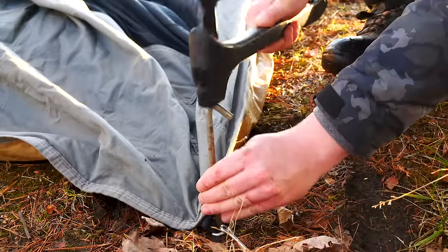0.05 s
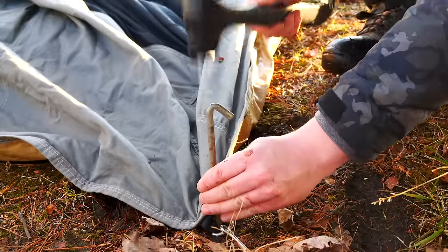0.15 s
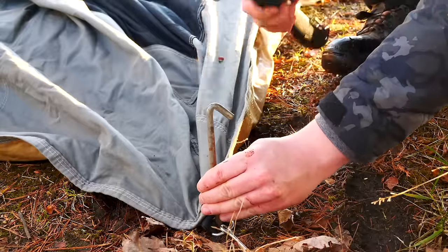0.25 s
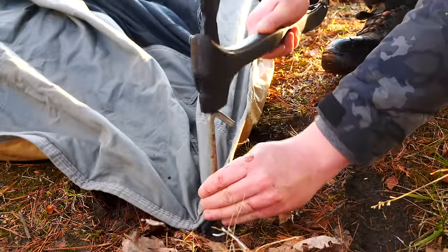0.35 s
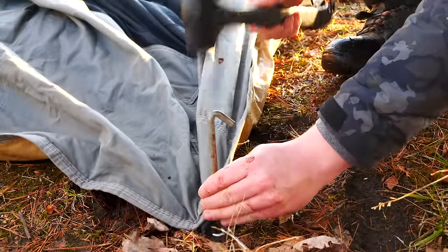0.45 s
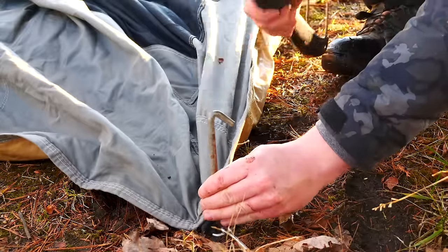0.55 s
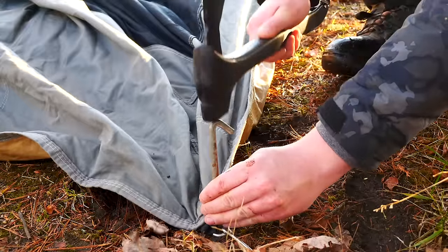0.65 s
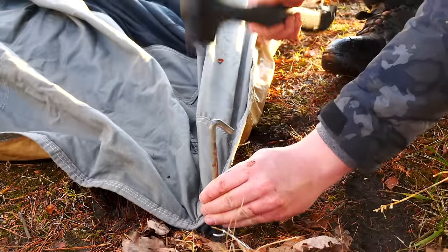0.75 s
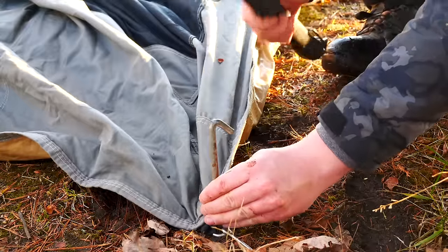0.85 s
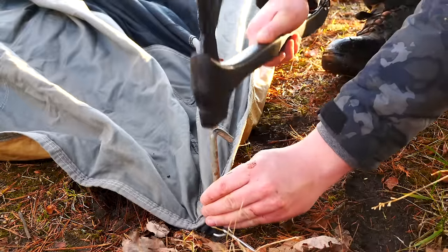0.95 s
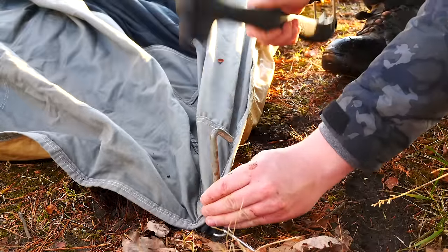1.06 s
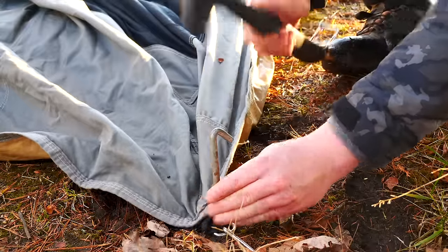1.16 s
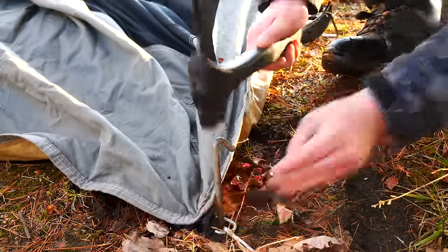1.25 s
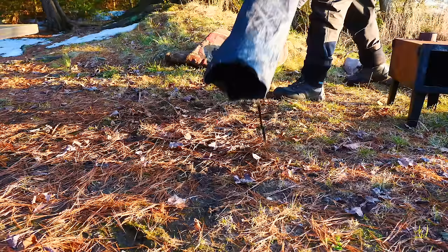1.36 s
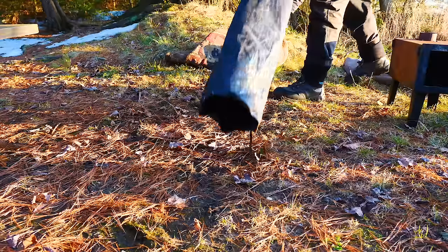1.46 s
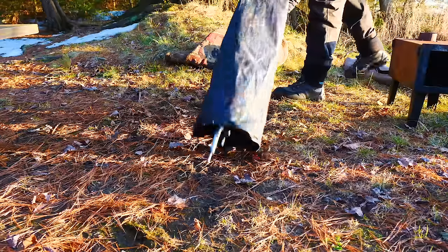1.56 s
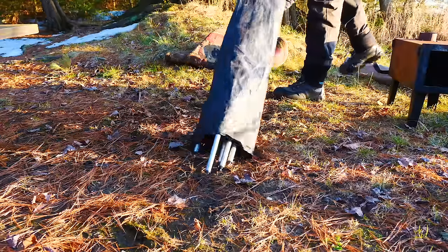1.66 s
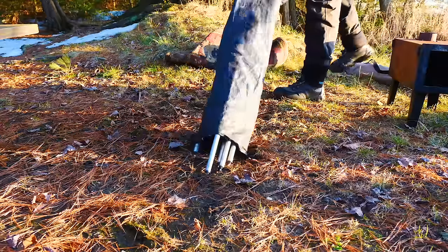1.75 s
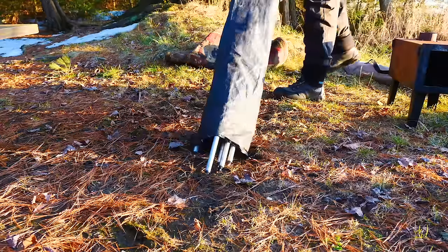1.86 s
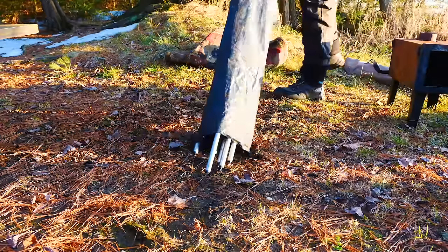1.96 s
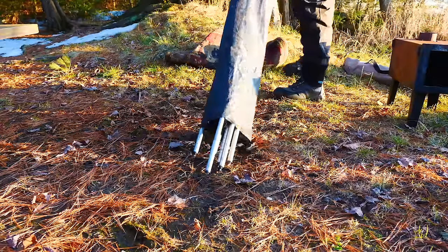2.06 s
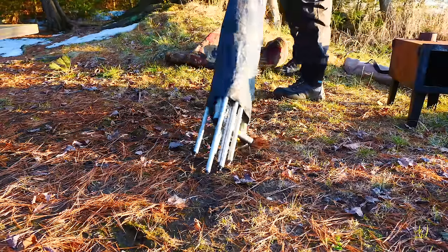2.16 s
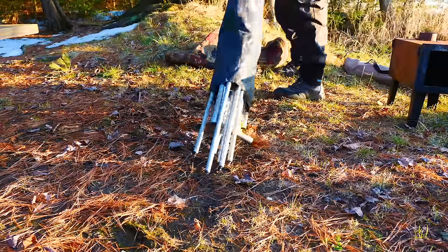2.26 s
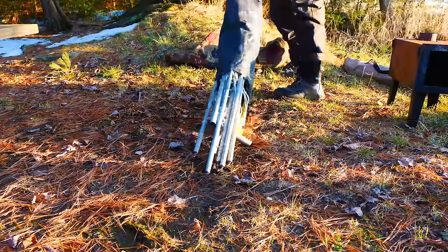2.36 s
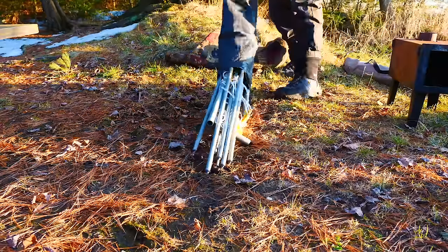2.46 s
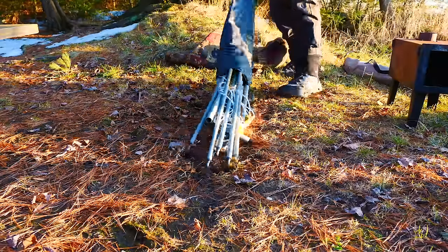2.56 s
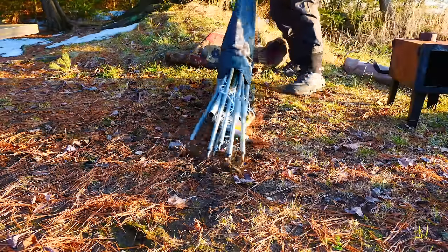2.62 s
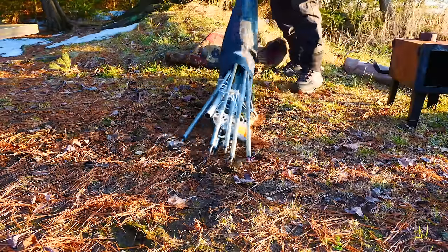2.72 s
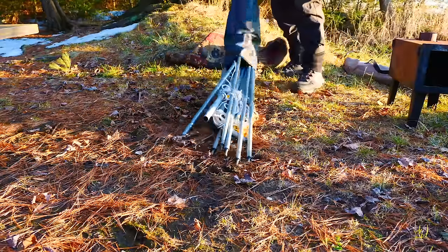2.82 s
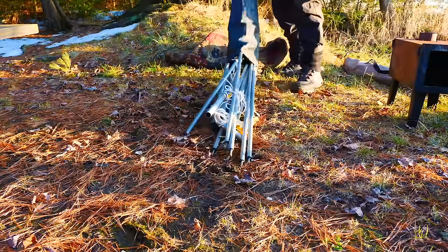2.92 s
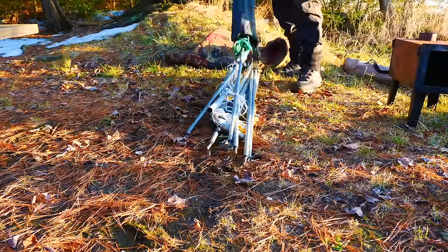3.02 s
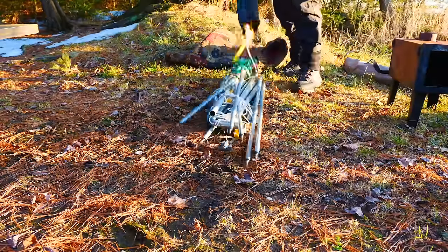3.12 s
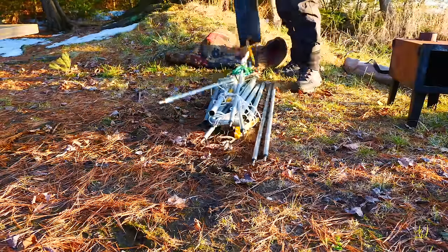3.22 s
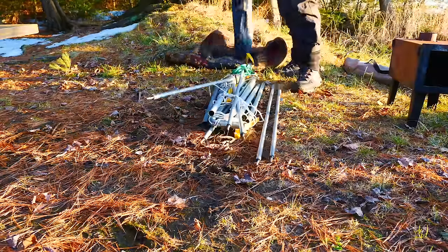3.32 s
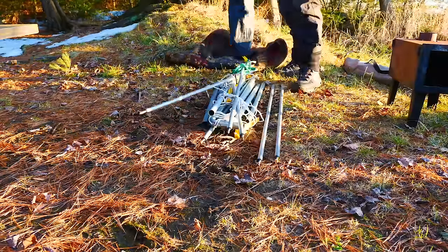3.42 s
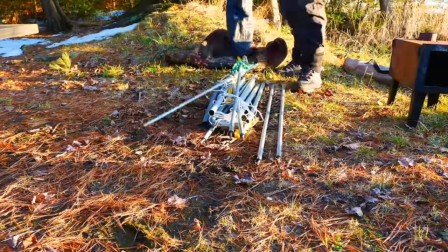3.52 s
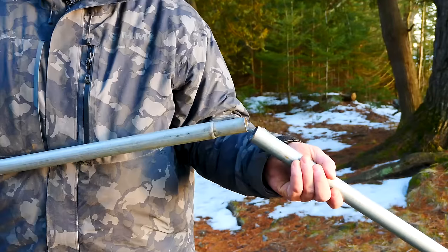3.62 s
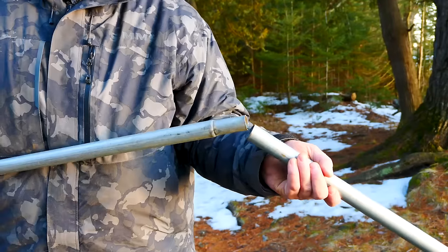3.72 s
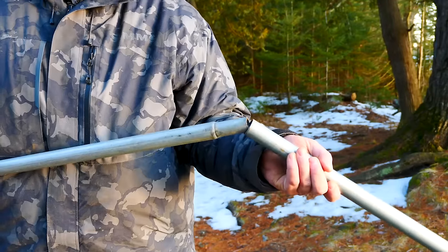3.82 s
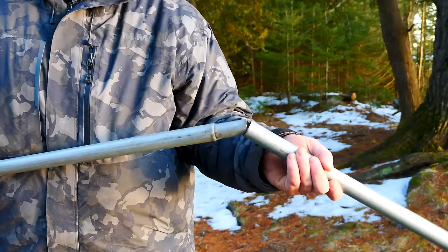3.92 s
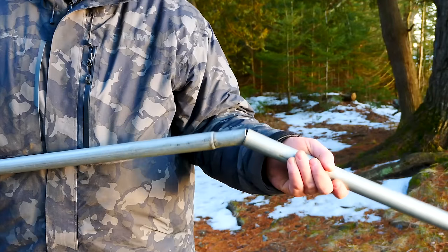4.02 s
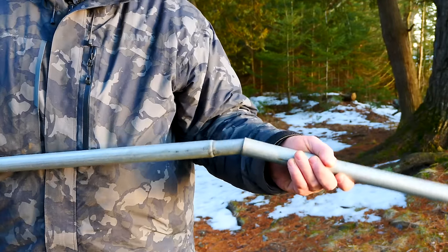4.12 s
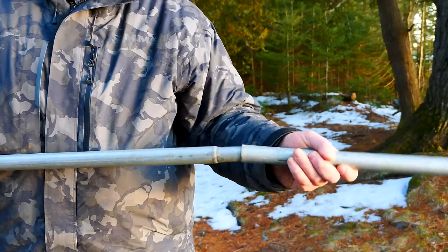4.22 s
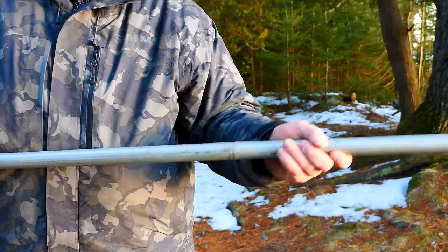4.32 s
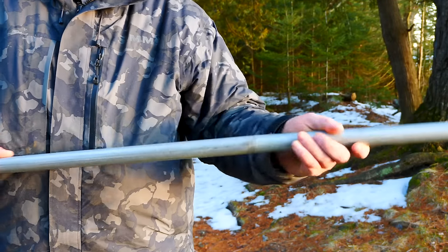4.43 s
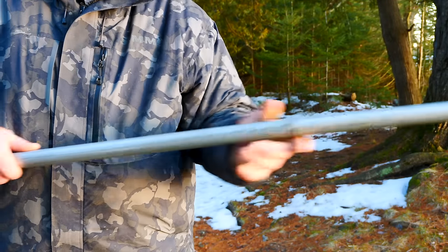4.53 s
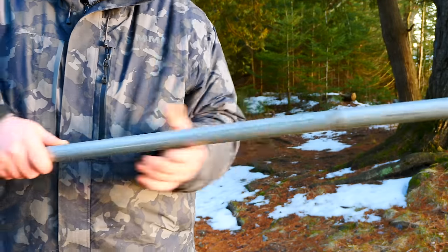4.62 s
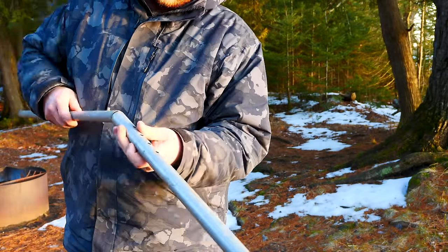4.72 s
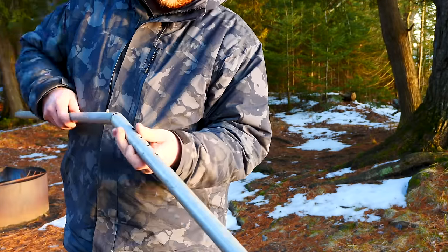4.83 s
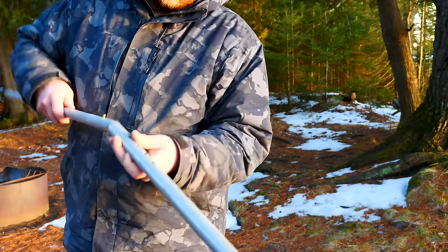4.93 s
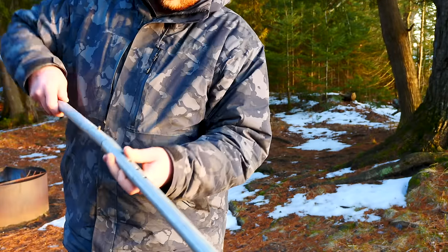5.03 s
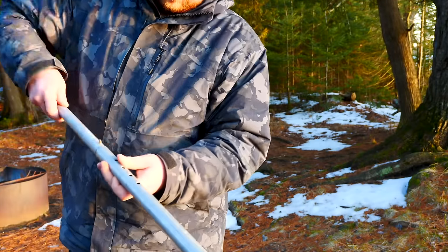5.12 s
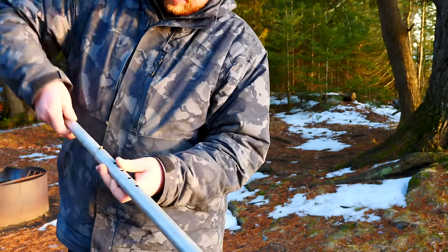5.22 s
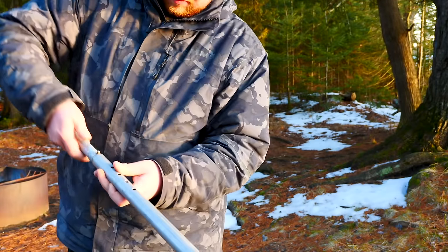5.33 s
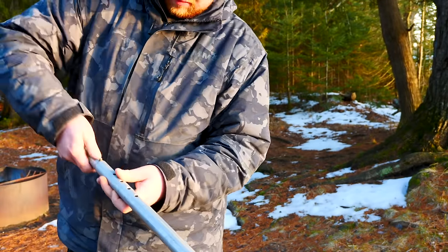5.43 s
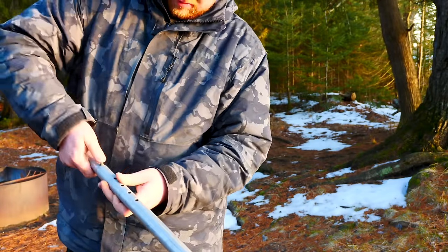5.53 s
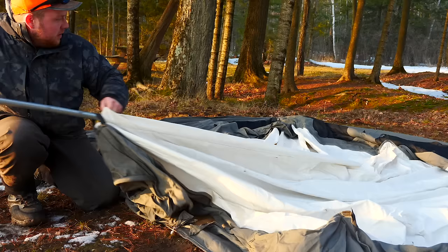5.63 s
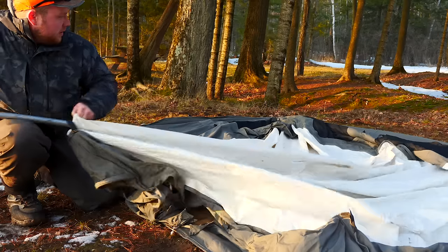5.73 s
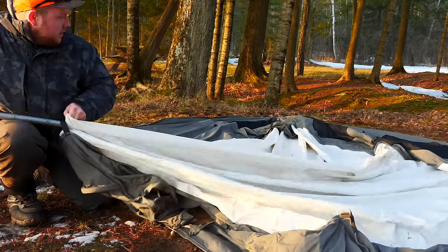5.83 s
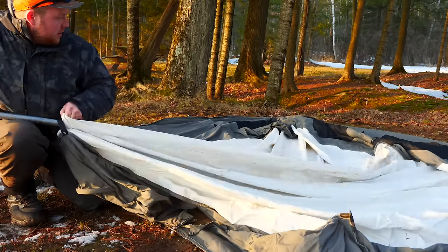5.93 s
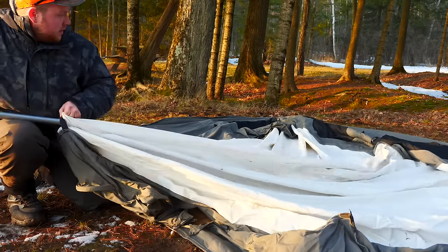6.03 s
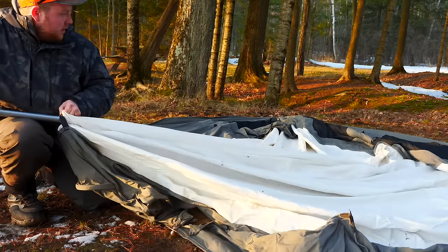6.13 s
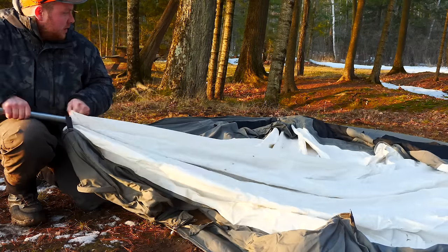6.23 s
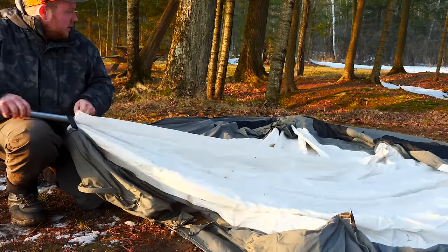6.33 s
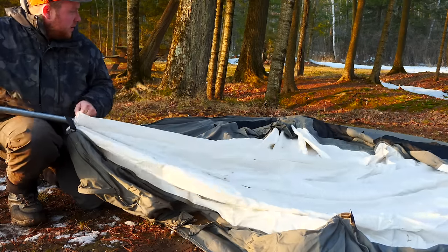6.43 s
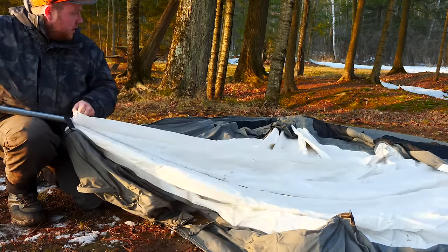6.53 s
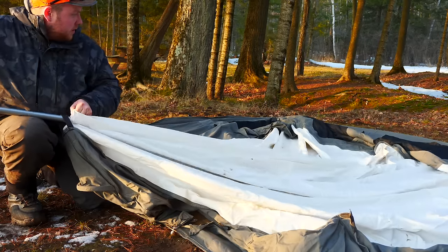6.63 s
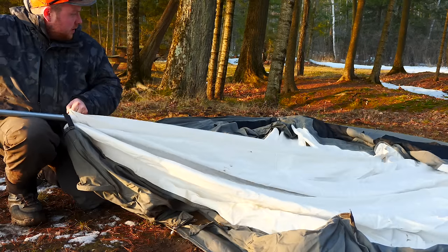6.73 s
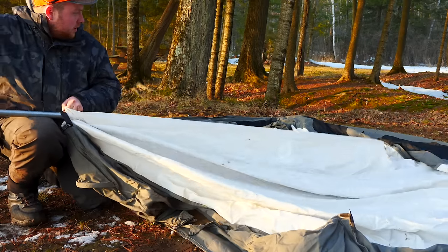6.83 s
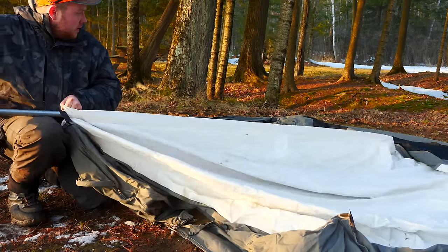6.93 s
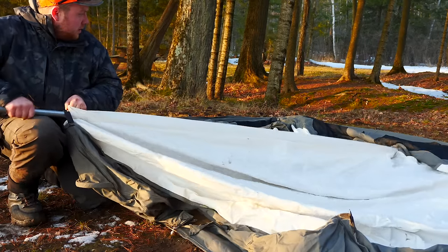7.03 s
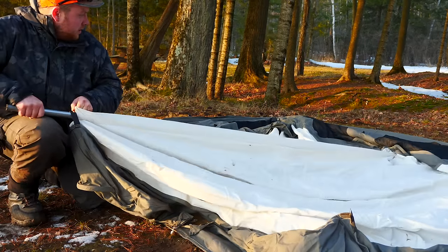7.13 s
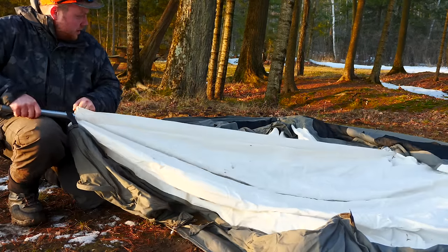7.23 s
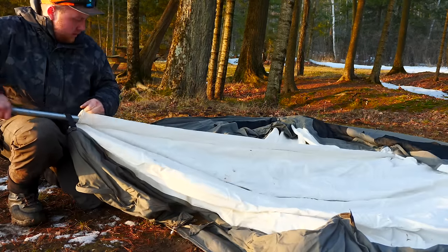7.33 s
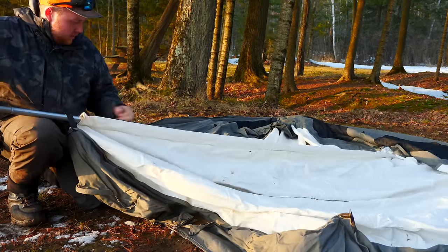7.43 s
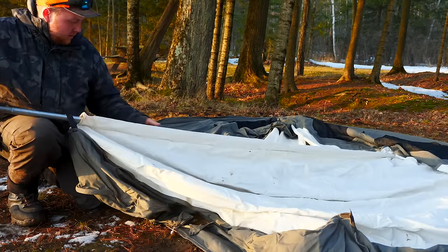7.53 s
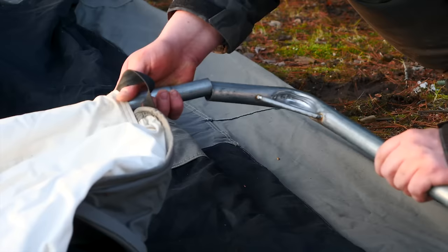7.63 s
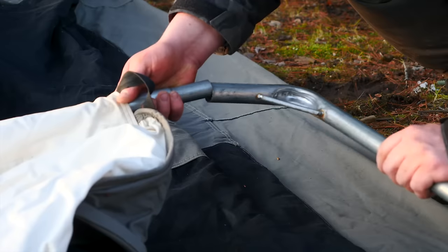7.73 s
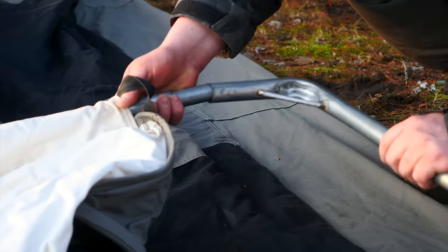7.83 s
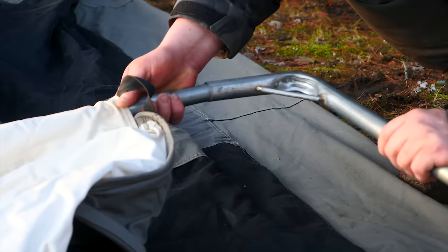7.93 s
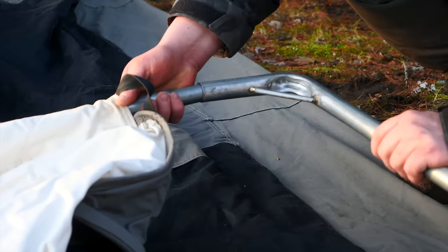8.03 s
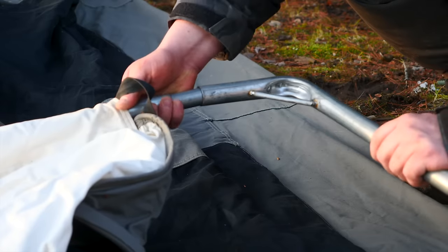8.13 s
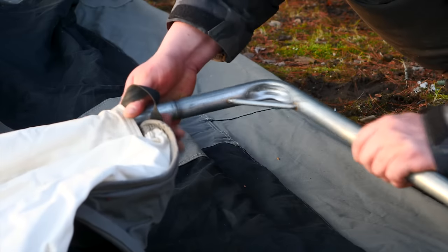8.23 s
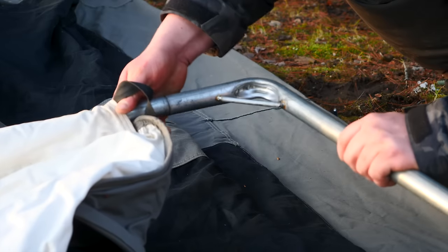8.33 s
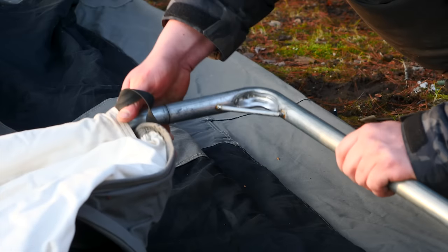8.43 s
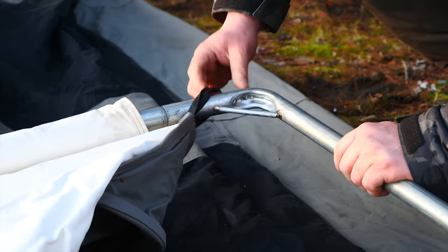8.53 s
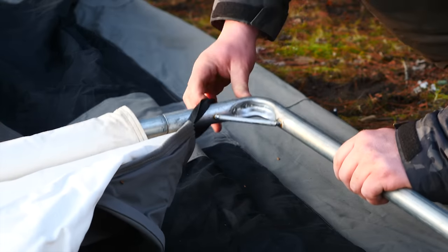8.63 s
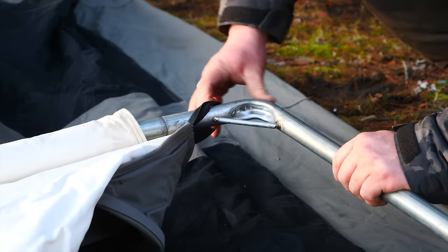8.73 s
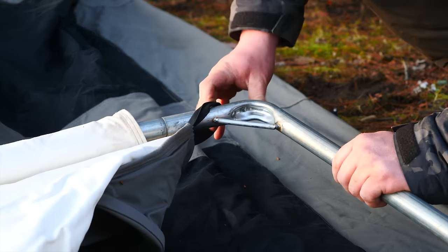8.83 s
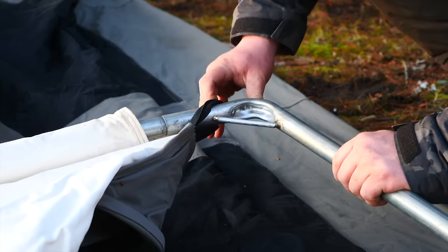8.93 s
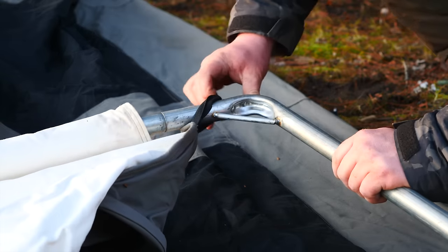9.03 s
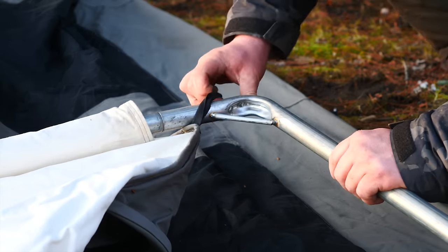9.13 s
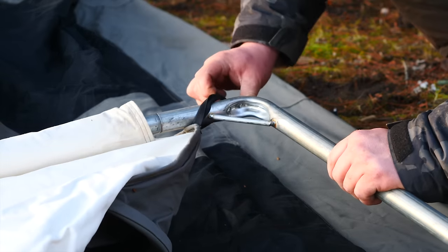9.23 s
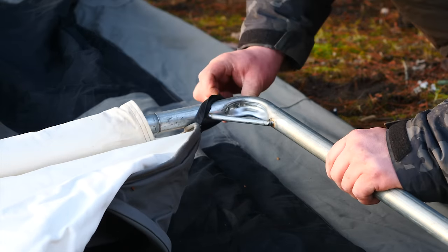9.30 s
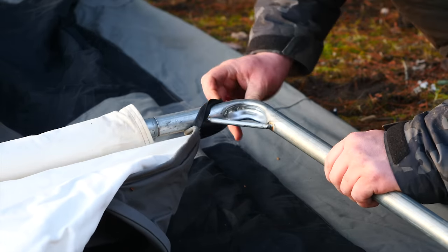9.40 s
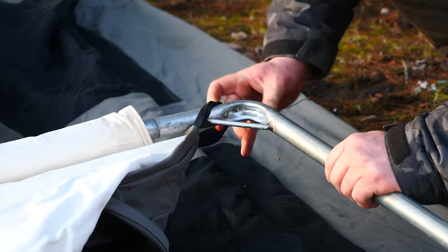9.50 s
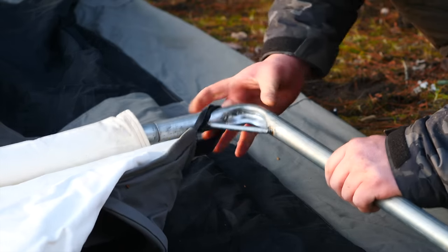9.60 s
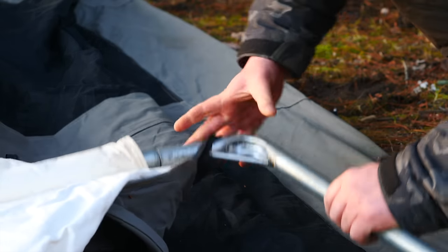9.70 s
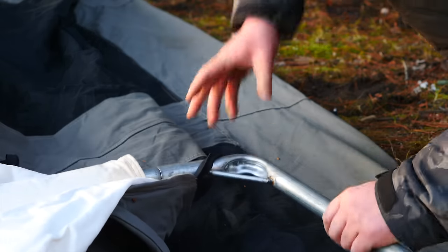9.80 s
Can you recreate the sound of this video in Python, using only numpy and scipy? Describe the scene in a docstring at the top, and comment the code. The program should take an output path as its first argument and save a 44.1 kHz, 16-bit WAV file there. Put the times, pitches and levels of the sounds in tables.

```python
"""Hammer blows, tumbling and clinking poles, a zip-like scrape and rustling cloth over a quiet wood's hush.
Short scenes of pitching a steel-frame tent, end to end: a peg hammered in, poles leaving their bag, two joints
pushed home, a pole slid through a woven sleeve, an elbow piece fitted. Steel is noise bursts and grit driving
decaying modes, cloth is shaped noise and crackle, the sleeve a thread-rate tone with hiss. Nearly mono; clips."""
import sys
import numpy as np
from scipy import signal
from scipy.fft import rfft, irfft, next_fast_len
from scipy.io import wavfile

SR = 44100
rng = np.random.default_rng(int(sys.argv[2]) if len(sys.argv) > 2 else 0)


def wrap_up_sound(samples):
    """Save the sound to the file named by the first command line argument, as 16-bit audio."""
    columns = np.atleast_2d(samples).T
    # keep every value between -1 and 1, then stretch to whole-number steps
    tamed = np.clip(columns, -1, 1)
    steps = np.round(tamed * 32767).astype(np.int16)
    wavfile.write(sys.argv[1], SR, steps)


N = 434826
TIME = np.arange(N) / SR
SPLIT_HZ = 1330   # between dull and bright halves

# cloth noise spectrum: (frequency [Hz], relative level [dB])
CLOTH_SPECTRUM = [(47, -26), (80, -15), (287, 3), (649, 7), (1500, 5), (11600, -11.5), (15500, -23)]
# steel contact noise spectrum: (frequency [Hz], relative level [dB])
STEEL_SPECTRUM = [(250, -38.5), (1240, -19), (2180, -14), (5540, -20.5), (7130, -23), (11600, -30.5),
                  (15500, -56)]
# hammer blows on the peg: (time [s], strike level [dB])
HAMMER_BLOWS = [(0.1126, -10), (0.4039, -10), (0.696, -9.5), (0.988, -11), (1.271, -9)]
# knocks on the poles: (time [s], strike level [dB], dull part re strike level [dB])
POLE_KNOCKS = [(1.414, -35.5, 8), (3.8666, -20.5, 10.5), (3.8756, -15, -9), (4.0295, -44, 15),
               (4.164, -46, 10), (4.193, -36, -3), (4.355, -13, -6), (4.442, -37.5, 9), (4.493, -35, -4),
               (4.63, -48.5, 22.5), (4.7764, -18.5, 7.5), (4.834, -28.5, -0.5), (4.924, -39, -6),
               (5.02, -35, -42), (5.221, -13.5, -0.5), (7.6233, -22.5, 11), (7.909, -49.5, 14),
               (7.9927, -35.5, 2), (8.02, -30, 7), (8.154, -32, -19), (9.634, -34, -47), (9.6628, -33, -37),
               (9.7657, -38, 5)]


def from_db(db):
    """Gain of a level in dB."""
    return 10 ** (np.asarray(db) / 20)


def rms_one(x):
    """Scale to rms 1."""
    return x / np.sqrt(np.mean(x ** 2) + 1e-20)


def gain_curve(rows):
    """Gain from (time [s], level [dB]) rows, linear in dB; -200 dB outside them."""
    rows = np.array(rows)
    return from_db(np.interp(TIME, rows[:, 0], rows[:, 1], left=-200, right=-200))


def drift(rate_hz):
    """Smoothed random signal, rms 1: noise through two equal one-pole low-passes."""
    r = np.exp(-2 * np.pi * rate_hz / SR)
    settle = 9000   # samples
    noise = rng.standard_normal(N + settle)
    return rms_one(signal.lfilter([1], [1, -2 * r, r * r], noise)[settle:])


def level_db(hz, spectrum):
    """Spectrum level at hz, interpolated over log frequency."""
    points = np.array(spectrum)
    return np.interp(np.log(hz), np.log(points[:, 0]), points[:, 1])


def bin_hz(size):
    """FFT bin frequencies, at least 1 Hz."""
    return np.maximum(np.arange(size // 2 + 1) * SR / size, 1)


def filtered(x, spectrum):
    """x through a smooth zero-phase response."""
    length = x.shape[-1]
    size = next_fast_len(length)
    gain = from_db(level_db(bin_hz(size), spectrum))
    return irfft(rfft(x, size) * gain, size)[..., :length]


def coloured(x, spectrum):
    """Dull and bright halves of x shaped by a spectrum, each rms 1."""
    size = next_fast_len(len(x))
    hz = bin_hz(size)
    shaped = rfft(x, size) * from_db(level_db(hz, spectrum))
    low = 1 / (1 + (hz / SPLIT_HZ) ** 4)
    dull = irfft(shaped * low, size)[:len(x)]
    bright = irfft(shaped * (1 - low), size)[:len(x)]
    return rms_one(dull), rms_one(bright)


def grains(per_s, spread_db):
    """Random clicks of uneven size and either sign, rms 1."""
    sizes = from_db(spread_db * np.minimum(rng.exponential(1, N), 4))
    signs = rng.choice([-1, 1], N)
    return rms_one(sizes * signs * (rng.random(N) < per_s / SR))


def ring(drive, hz, t60_s):
    """Two-pole resonator: a unit click starts a decaying sine of height 1."""
    r, w = from_db(-60 / (t60_s * SR)), 2 * np.pi * hz / SR
    return signal.lfilter([0, np.sin(w)], [1, -2 * r * np.cos(w), r * r], drive + 1e-18)


def clicks(times_s, db):
    """One impulse at each time."""
    out = np.zeros(N)
    out[np.round(np.asarray(times_s) * SR).astype(int)] = from_db(db)
    return out


def cracks(events, halves, t60_s, tail_t60_s, tail_db):
    """Each contact is a noise burst with a sub-millisecond rise and fast decay, over a softer longer tail."""
    rows, out = np.array(events), 0
    fast, slow = from_db(-60 / (t60_s * SR)), from_db(-60 / (tail_t60_s * SR))
    rise = np.exp(-1 / (0.00087 * SR))
    for half, db in zip(halves, (rows[:, 1] + rows[:, 2], rows[:, 1])):
        hits = signal.lfilter([1 - rise], [1, -rise], clicks(rows[:, 0], db) + 1e-18)
        burst = signal.lfilter([1], [1, -fast], hits)
        tail = signal.lfilter([1], [1, -slow], hits)
        out = out + half * (burst + from_db(tail_db) * tail)
    return out


def wood():
    """Steady hush of the wood: shaped noise."""
    # hush spectrum: (frequency [Hz], relative level [dB])
    hush_spectrum = [(35, -42), (60, -5), (869, 2), (1480, -21), (6120, -14), (15500, -58)]
    return from_db(-62.5) * rms_one(filtered(rng.standard_normal(N), hush_spectrum))


def wind():
    """Lumpy low-band noise on the microphone: a faint steady rumble and one gust."""
    # gust envelope: (time [s], level [dB])
    gust_rows = [(4.76, -39), (5.68, -48.5)]
    rumble_band = signal.butter(2, [28, 55], "band", fs=SR, output="sos")
    low_band = signal.butter(1, [30, 200], "band", fs=SR, output="sos")
    rumble = rms_one(signal.sosfilt(rumble_band, rng.standard_normal(N)))
    low = rms_one(signal.sosfilt(low_band, rng.standard_normal(N)))
    return gain_curve(gust_rows) * (rumble + from_db(-7.0) * low) + from_db(-60.5) * low


def soil():
    """Blows send a late slow wave through the ground; modes of opposite sign make it swell, then beat."""
    # soil modes under the microphone stand: (frequency [Hz], level re blow [dB], t60 [s])
    ground_modes = [(36, -28, 0.5), (46.3, -26, 0.38)]
    lag_s = 0.0306
    s, db = np.transpose(HAMMER_BLOWS)
    return sum((-1) ** k * ring(clicks(s + lag_s, db + mode_db), hz, t60_s)
               for k, (hz, mode_db, t60_s) in enumerate(ground_modes))


def cloth():
    """Cloth and leaves: patchy hiss with low crackle from creases; soft thuds and snaps of cloth and poles."""
    # rustle envelopes, one list a scene: (time [s], level of bright part [dB])
    rustle_scenes = [
        [(0, -59.5), (1.408, -54.5)],
        [(1.412, -39), (1.7, -29.5), (3.1, -31), (3.45, -50), (3.7, -49.5)],
        [(3.705, -53.5), (4.3, -50), (4.55, -49), (4.713, -42)],
        [(4.718, -54), (5.0, -50.5), (5.3, -44), (5.48, -52), (5.68, -58.5)],
        [(5.685, -42.5), (5.86, -37.5), (6.34, -45), (6.6, -51), (7.09, -41), (7.612, -55)],
        [(7.616, -58), (8.86, -56), (8.92, -48), (9.35, -50.5), (9.52, -57.5), (9.86, -47.5)],
    ]
    # dull part re bright part, by scene: level [dB]
    rustle_dull_db = [-6, 5.5, -2.5, -7.5, 2.5, 2]
    # soft low thuds and snaps of cloth and settling poles:
    # (time [s], strike level [dB], dull part re strike level [dB])
    thuds_and_snaps = [(3.468, -69, 43), (5.695, -57.5, 32), (5.738, -54, 32.5), (6.2585, -43, 21),
                       (6.763, -48, 20), (7.0552, -31, 14)]
    dull, bright = coloured(rng.standard_normal(N), CLOTH_SPECTRUM)
    crackle, _ = coloured(grains(500, spread_db=4), CLOTH_SPECTRUM)
    low = (dull + crackle) / np.sqrt(2)
    patchy = from_db(2.0 * drift(12))
    out = cracks(thuds_and_snaps, (dull, bright), t60_s=0.036, tail_t60_s=0.2, tail_db=-13)
    for rows, dull_db in zip(rustle_scenes, rustle_dull_db):
        low_gain = from_db(dull_db + 1.34 * drift(31))
        out += gain_curve(rows) * patchy * (bright + low_gain * low)
    return out


def sleeve():
    """One bump per thread gives a wavering tone that follows speed and roughens when fast, plus hiss."""
    # pole pushes: (start [s], length [s], first speed [threads/s], limit speed [threads/s],
    #               time constant of speed change [s], push level [dB])
    pushes = [(5.885, .285, 500, 3050, 0.095, -1.5), (6.179, .012, 2200, 2800, .003, -13),
              (6.213, .013, 2400, 2900, .003, -13), (6.238, .008, 2400, 2800, .003, -18),
              (6.8, .06, 250, 1500, .04, -27), (6.872, 0.032, 800, 2000, 0.028, -14),
              (6.913, .016, 5200, 1800, .007, -18), (6.926, 0.12, 1900, 2760, 0.011, -12)]
    push_sag_db_per_s, tone_sag_db_per_s = 58, 25
    tone_stop_db_per_s, hiss_stop_db_per_s = 1500, 450
    break_hz, break_width_hz, broken_db = 2690, 50, -5   # threads blur into a scrape above break_hz
    out = 0
    dull, bright = coloured(rng.standard_normal(N), CLOTH_SPECTRUM)
    muffled = signal.lfilter(*signal.butter(1, 8000, fs=SR), bright)   # heard from inside the sleeve
    hiss = muffled + from_db(-5.0) * dull
    for start, length, first_hz, limit_hz, change_s, db in pushes:
        since, past = np.maximum(TIME - start, 0), np.maximum(TIME - start - length, 0)
        progress = 1 - np.exp(-since / change_s)   # 0 to 1
        hz = first_hz + (limit_hz - first_hz) * progress
        broken = 1 / (1 + np.exp((break_hz - hz) / break_width_hz))
        wavering_hz = hz * (1 + .065 * progress ** 2 * drift(300))
        phase = 2 * np.pi * np.cumsum(wavering_hz) / SR
        tone = (1 - broken + broken * from_db(broken_db) * drift(400)) * np.sin(phase)
        tone += from_db(-17) * drift(300) * np.sin(2 * phase)
        tone += from_db(-15 + 5 * drift(200)) * np.sin(phase / 2)   # every other thread
        push = progress ** 2 * from_db(db - push_sag_db_per_s * np.minimum(since, length))
        tone_db = 3.5 * drift(60) - tone_sag_db_per_s * since - tone_stop_db_per_s * past
        hiss_db = -13.5 + 2.0 * drift(42) - hiss_stop_db_per_s * past
        out = out + push * (from_db(tone_db) * tone + from_db(hiss_db) * hiss)
    return out


def rubbing():
    """Gain of steel rubbing on steel: each rub swells and fades, straight in dB."""
    # rubs: (loudest time [s], peak level [dB], swell over 50 dB [s], fade over 50 dB [s])
    rubs = [(4.346, -11, 0.047, 0.045), (4.58, -46, 1, 0.19), (5.03, -35.5, 0.054, 0.096),
            (5.191, -25, 0.23, 0.15), (8.303, -26, 0.1, 0.26)]
    return sum(from_db(db - 50 * np.maximum((s - TIME) / swell, (TIME - s) / fade))
               for s, db, swell, fade in rubs)


def clink_touches():
    """Time, level and pitch of every clink and its softer rebound."""
    # clinks among the tumbling poles: (time [s], strike level [dB], pitch struck hardest [Hz])
    clinks = [(1.545, -23.5, 4160), (1.661, -14.5, 1310), (1.688, -10.5, 1590), (1.748, -42, 4160),
              (1.7925, -12.5, 1270), (2.042, -10.5, 750), (2.0728, -17, 4200), (2.297, -15, 1500),
              (2.359, -12, 1550), (2.5501, -12.5, 900), (2.6, -11, 1480), (2.7098, -12.5, 5900),
              (2.905, -11, 3470), (3.0013, -17, 5200), (3.1276, -21, 2580), (3.147, -18, 660),
              (3.206, -15, 4400), (3.2915, -14.5, 4060), (3.331, -26.5, 4940), (3.524, -36, 3200),
              (3.577, -31, 3570)]
    rebound_s, rebound_db = .009, -3
    s, db, hz = np.transpose(clinks)
    return np.r_[s, s + rebound_s], np.r_[db, db + rebound_db], np.r_[hz, hz]


def clink_rows():
    """Clinks as knock rows; the lower the pitch, the duller the contact."""
    s, db, hz = clink_touches()
    dull_db = 11 * np.log2(2 * SPLIT_HZ / hz)   # 11 dB per octave
    return list(zip(s, db - 8 - np.maximum(dull_db, 0), dull_db))


def clinking(modes, ring_db):
    """Each clink rings the modes near its own pitch."""
    narrow_db_per_oct = 15
    s, db, pitch = clink_touches()
    strength_db = rng.normal(0, 3, (len(s), len(modes)))
    out = 0
    for k, (hz, mode_db, t60_s) in enumerate(modes):
        off_pitch_db = narrow_db_per_oct * np.abs(np.log2(hz / pitch))
        hit_db = db + ring_db + mode_db + strength_db[:, k] - off_pitch_db
        out = out + ring(clicks(s, hit_db), hz, t60_s)
    return out


def ringing(modes, effort, start_s, end_s, ring_db, per_s, order, freed_db_per_s=0):
    """Knocks (dull ones low modes, bright ones high) and small touches drive the modes; cut off at end_s."""
    s, db, dull_db = np.transpose(POLE_KNOCKS)
    a, b, out = round(start_s * SR), round(end_s * SR), np.zeros(N)
    knock_db = db + ring_db + freed_db_per_s * (s - start_s)
    high_db = -0.15 * np.maximum(dull_db, -25)   # brighter knocks ring high modes more
    freed = from_db(freed_db_per_s * (TIME - end_s))
    touches = (effort * freed * grains(per_s, spread_db=2.5))[a:b]
    at = np.flatnonzero(touches)
    strength_db = rng.normal(0, 2, (len(s), len(modes)))
    for k, (hz, mode_db, t60_s) in enumerate(modes):
        tilt_db = dull_db if hz < 2 * SPLIT_HZ else high_db
        hit_db = knock_db + mode_db + tilt_db + strength_db[:, k]
        drive = rng.choice([-1, 1]) * clicks(s, hit_db)[a:b]
        share = rng.standard_normal(len(at))
        share = share * np.abs(share) ** order   # higher order: each touch picks out fewer modes
        drive[at] += touches[at] * share * from_db(mode_db) / np.sqrt(t60_s * SR)
        out[a:b] += ring(drive, hz, t60_s)
    return out


def ticks():
    """Knocks, clinks and rubs carry thin hiss above 6550 Hz, more on bright contacts."""
    high_pass = signal.butter(2, 6550, "high", fs=SR, output="sos")
    thin = rms_one(signal.sosfilt(high_pass, rng.standard_normal(N)))
    rows = [(s, db - 5.5 - 0.23 * dull_db, 0) for s, db, dull_db in POLE_KNOCKS + clink_rows()]
    tick = cracks(rows, (0, thin), t60_s=0.039, tail_t60_s=0.18, tail_db=-20)
    return tick + from_db(-13) * rubbing() * thin


def heap_modes(count=110):
    """Unlike tubes damping each other: many short random modes, coloured like steel noise."""
    hz = np.exp(rng.uniform(np.log(250), np.log(13000), count))
    db = level_db(hz, STEEL_SPECTRUM)
    top_db = max(db)
    return list(zip(hz, db - top_db, rng.uniform(.03, .11, count)))


def bundle_ring(tumble, start_s, end_s):
    """Tumbling poles ring as a damped heap and as longer modes that strengthen as they leave the bag."""
    # bundle modes: (frequency [Hz], relative level [dB], t60 [s])
    bundle_modes = [(630, 1, .7), (935, -4, .8), (1265, 3, .16), (1650, -1, .15), (1950, -2, .15),
                    (2400, -2, .35), (2930, -3, .3), (3521, -7, .3), (4160, 0, .15), (4860, -6, .15),
                    (5880, -8, .25), (6210, -7, .4), (11400, -17, .2)]
    heap = heap_modes()
    out = clinking(heap, ring_db=-16) + clinking(bundle_modes, ring_db=-6)
    out += ringing(heap, from_db(3) * tumble, start_s, end_s, ring_db=-26, per_s=220, order=1)
    return out + ringing(bundle_modes, from_db(5) * tumble, start_s, end_s, ring_db=-18.5, per_s=350,
                         order=1, freed_db_per_s=3.0)


def joint_ring(rub, start_s, end_s):
    """Hands damp the joint, low modes most, until it is home; then it rings free."""
    # joint modes: (frequency [Hz], relative level [dB], undamped t60 [s])
    joint_modes = [(1010, -5, 2.0), (1017, 1, 2.5), (1642, 1, 1.0), (2388, -4, 1.2), (3240, -3, .12),
                   (4043, -8, .6), (4430, -11, .25)]
    home_s, held_low_t60_s, held_high_t60_s = 4.3, .14, .25
    held = [(hz, db, min(t60_s, held_low_t60_s if hz < 2000 else held_high_t60_s))
            for hz, db, t60_s in joint_modes]
    out = ringing(held, rub, start_s, home_s, ring_db=-15, per_s=1500, order=0)
    return out + ringing(joint_modes, from_db(-7) * np.sqrt(rub), home_s, end_s, ring_db=-16,
                         per_s=1500, order=0)


def poles():
    """Contact cracks, clumped grit from rubbing and tumbling, and the ringing of each piece."""
    # poles jostling as they slide from the bag: (time [s], effort [dB])
    tumble_rows = [(1.41, -49), (1.69, -26.5), (2.0, -56), (2.15, -31), (2.5, -33), (2.97, -40),
                   (3.135, -24.5), (3.25, -44.5), (3.65, -62)]
    # second joint modes: (frequency [Hz], relative level [dB], t60 [s])
    slider_modes = [(1335, 10, .06), (1740, 2, .06), (2150, 4, .15), (2460, 5, .12), (3176, 3, .12),
                    (4016, -9, .45), (4167, -8, .27), (5550, -3, .12), (7100, -8, .15), (11500, -14, .13)]
    # elbow piece modes: (frequency [Hz], relative level [dB], t60 [s])
    elbow_modes = [(4130, -19.5, 0.55), (4163, -13, 0.4)]
    bundle_s, joint_s, slider_s, sleeve_s, elbow_s = 1.41, 3.7, 4.715, 5.68, 7.6   # scene starts
    noise = coloured(rng.standard_normal(N), STEEL_SPECTRUM)
    out = cracks(POLE_KNOCKS + clink_rows(), noise, t60_s=0.05, tail_t60_s=0.19, tail_db=-21)
    dull, bright = coloured(grains(4000, spread_db=2.5), STEEL_SPECTRUM)
    rub = rubbing()
    tumble = gain_curve(tumble_rows) * from_db(3 * drift(11))   # comes in clumps
    grit_gain = (rub + from_db(-4) * tumble) * from_db(2 * drift(25))
    out += grit_gain * (from_db(-3) * dull + bright)
    out += bundle_ring(tumble, bundle_s, joint_s) + joint_ring(rub, joint_s, slider_s)
    out += ringing(slider_modes, from_db(3) * rub, slider_s, sleeve_s, ring_db=-12.5, per_s=1500, order=0)
    return out + ringing(elbow_modes, from_db(13) * rub, elbow_s, N / SR, ring_db=2.5, per_s=680, order=0)


def with_dull(events, dull_db):
    """Add one common dull share to (time, level) rows."""
    return [(s, db, dull_db) for s, db in events]


def hammer():
    """Blows and light bounces crack, and the held peg rings briefly in a few modes."""
    # light touches of hammer and peg between blows: (time [s], strike level [dB])
    bounces = [(0.178, -23), (0.2664, -37), (0.6212, -41), (0.7755, -29)]
    # peg modes: (frequency [Hz], level re strike [dB], t60 [s])
    peg_modes = [(541, -11.5, 0.036), (1985, -5.5, 0.041), (3260, 8, 0.0084)]
    hits = with_dull(HAMMER_BLOWS, -1) + with_dull(bounces, -9)
    s, db, _ = np.transpose(hits)
    noise = coloured(rng.standard_normal(N), STEEL_SPECTRUM)
    out = cracks(hits, noise, t60_s=0.029, tail_t60_s=0.36, tail_db=-35.0)
    strength_db = rng.normal(0, 4.3, (len(s), len(peg_modes)))
    for k, (hz, mode_db, t60_s) in enumerate(peg_modes):
        out += ring(clicks(s, db + mode_db + strength_db[:, k]), hz, t60_s)
    return out


def scene():
    """Handling sounds lose their bass; soil, wind and the wood are added, then a faint flickering left-right
    difference."""
    high_pass = signal.butter(3, 75, "high", fs=SR, output="sos")
    handled = signal.sosfilt(high_pass, cloth() + sleeve() + ticks() + poles() + hammer())
    mid = wood() + wind() + soil() + handled
    treble_lifted = mid + 2.46 * np.diff(mid, prepend=0)
    side = from_db(-33) * treble_lifted * drift(200)
    return np.array([mid + side, mid - side])


def record(dry):
    """The microphone colours, peaks beyond full scale clip, the top is cut."""
    # microphone response: (frequency [Hz], gain [dB])
    mic_response = [(900, -2), (1280, 2.5), (1520, -1.5), (4200, 3.5), (6200, 3), (7300, -0.5)]
    clipped = np.clip(filtered(dry, mic_response), -1, 1)
    top_cut = signal.cheby2(14, 70, 16600, fs=SR, output="sos")   # 70 dB down from 16.6 kHz
    return signal.sosfilt(top_cut, clipped)


dry = scene()
out = record(dry)
wrap_up_sound(out)
```